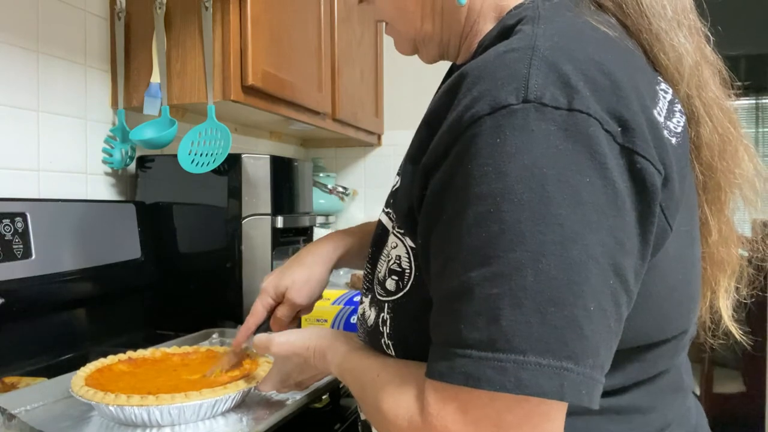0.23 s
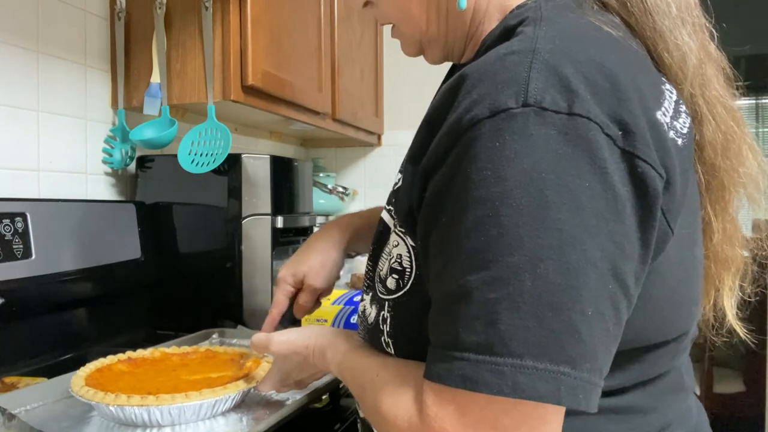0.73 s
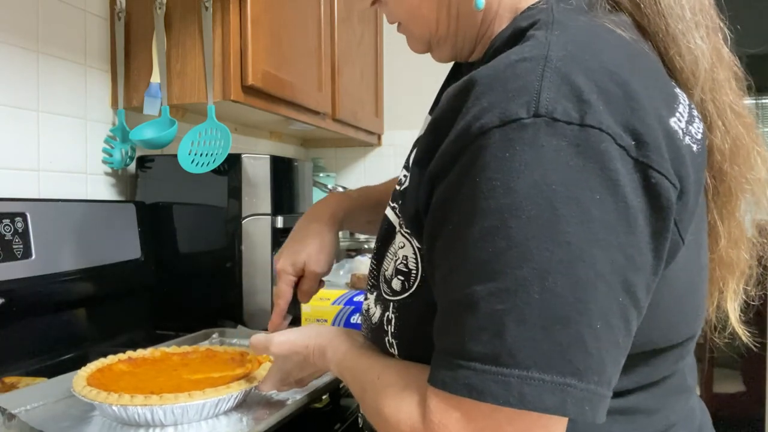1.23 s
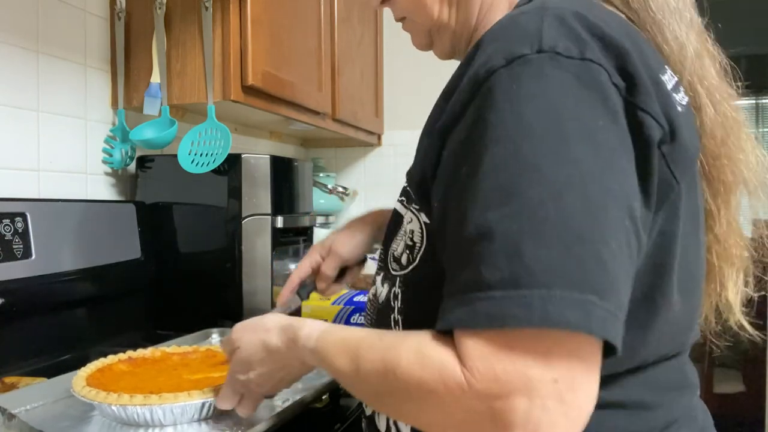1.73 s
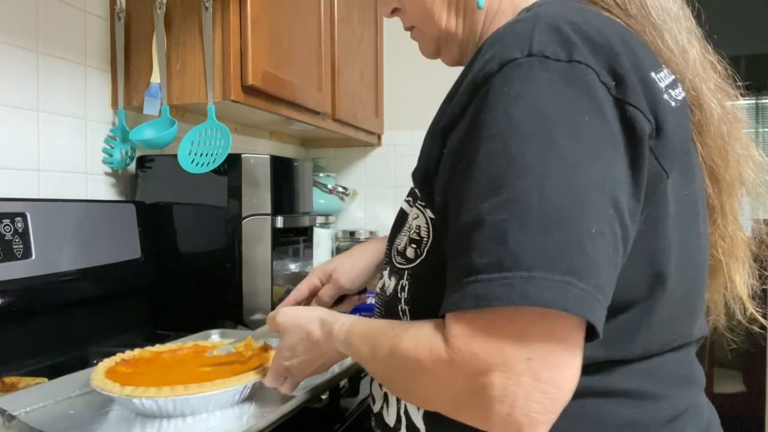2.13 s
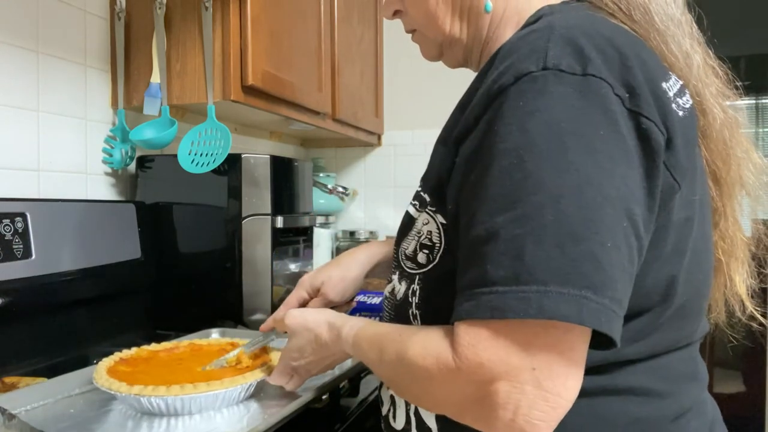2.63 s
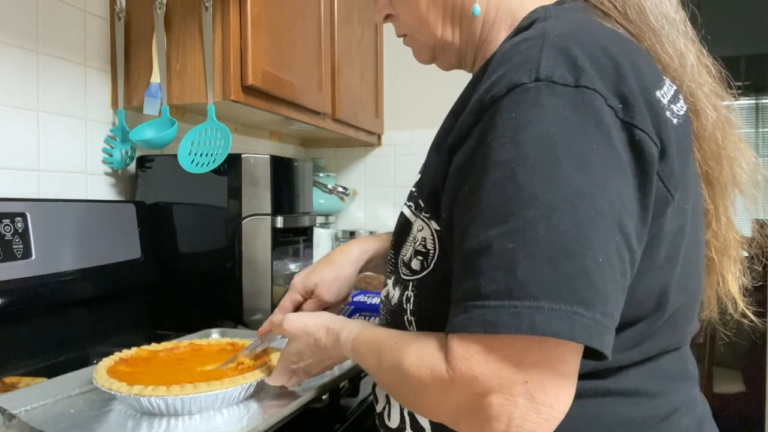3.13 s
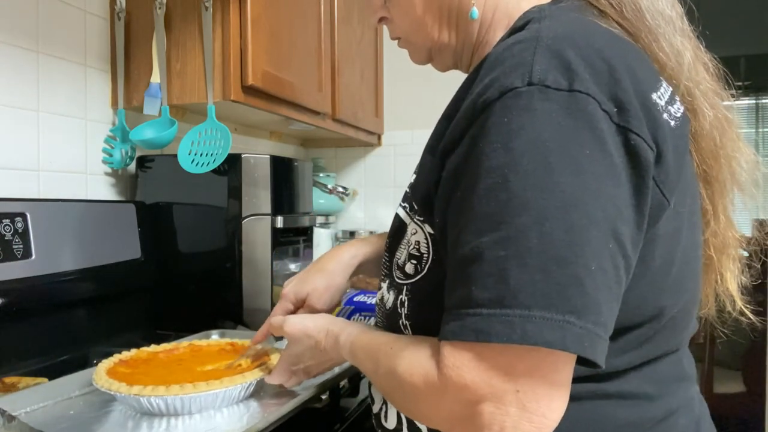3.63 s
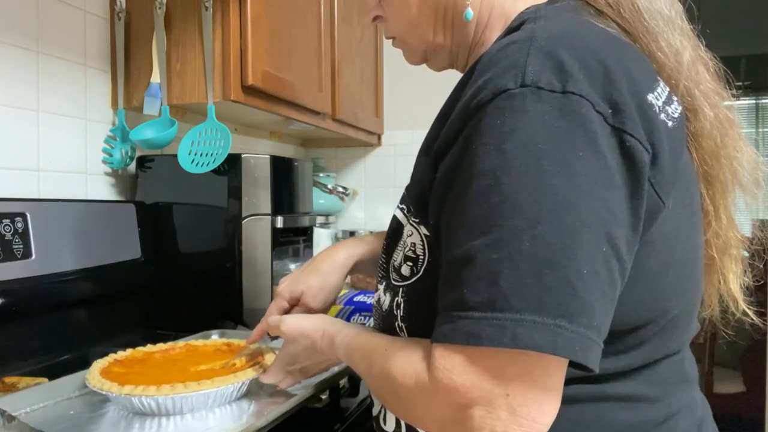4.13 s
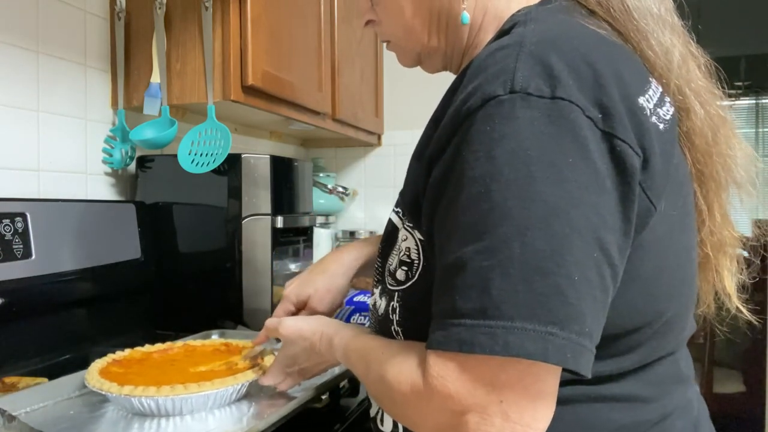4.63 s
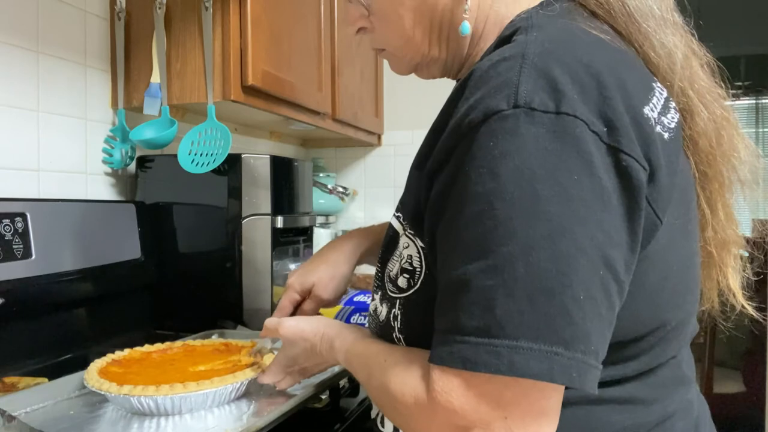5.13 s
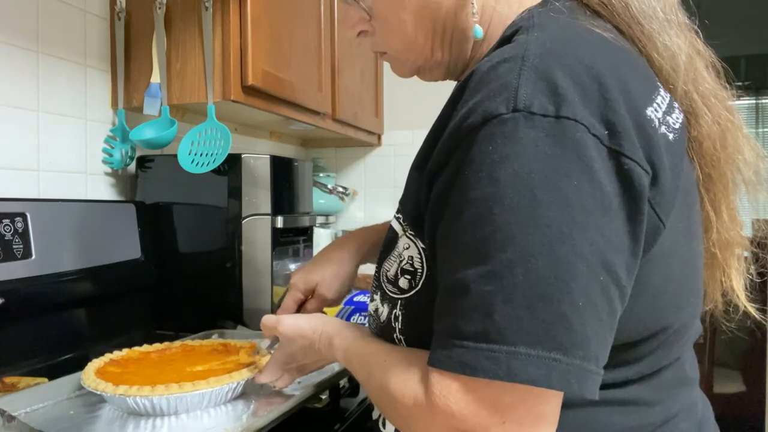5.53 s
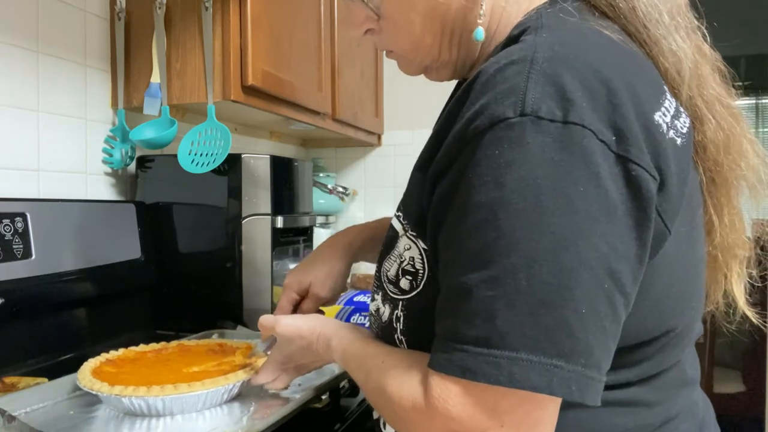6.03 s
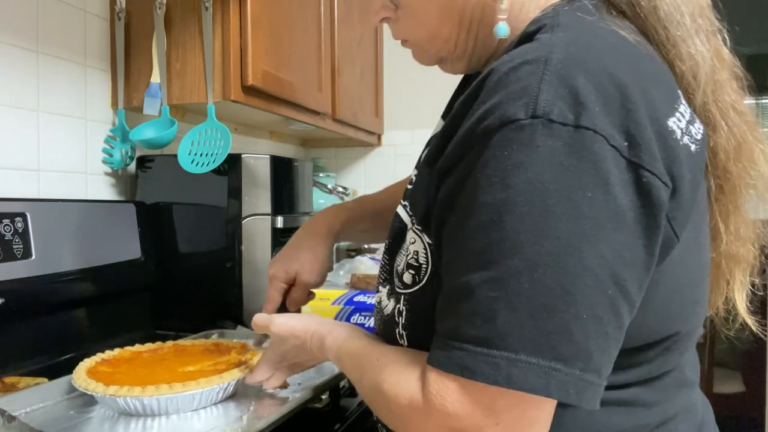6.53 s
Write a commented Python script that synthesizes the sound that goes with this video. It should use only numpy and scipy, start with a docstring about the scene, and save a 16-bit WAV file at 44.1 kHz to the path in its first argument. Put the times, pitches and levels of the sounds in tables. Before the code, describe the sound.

A small tiled kitchen with a low, slightly wavering appliance rumble and very faint hiss. For the first 0.4 s there are only tiny ticks; then a tin knock with a tray thump, a light scrape, and a sharp foil crack at 0.77 s. After a lull, crisp crinkly jabs and scrapes cluster from 1.5 to 2.2 s, with a lighter tap near 2.5 s. It is almost still until 3.4 s, when small knocks and a faint blade clink restart the work. Taps continue to 4.1 s, with a bright loud snap at 4.3 s and softer ones to 4.7 s. From 5.0 s strong clicks, blade clinks and tray bumps come in quick groups, busiest at 5.0-5.1 and 5.7-6.1 s, with rustly scraping between. Softer tin taps and rubs trail off around 6.4-6.7 s. Sounds are close, dry and metallic, with short room echoes.

```python
"""Cutting a pie in a foil tin

In a small tiled kitchen a knife works round the crust of a pie; the foil tin stands on a baking tray.
Each jab buckles the foil in a burst of clicks, rings the tin and bumps the tray; at times the blade rings.
Scraping strokes of blade and tin are streams of tiny clicks; appliances rumble as flickering noise bands.
A phone with two microphone ports, a step away, hears it direct, by quick echoes and through the room's tail."""
import sys
import numpy as np
from scipy import signal
from scipy.fft import rfft, irfft, next_fast_len
from scipy.io import wavfile
from scipy.ndimage import uniform_filter1d

SR = 44100
rng = np.random.default_rng(int(sys.argv[2]) if len(sys.argv) > 2 else 0)


def persist_wave(psi):
    """Save psi, clipped to +-1, as 16-bit WAV."""
    counts = np.round(np.clip(psi, -1, 1) * 32767).astype(np.int16)
    wavfile.write(sys.argv[1], SR, np.atleast_2d(counts).T)


N = 299356
T = np.arange(N) / SR  # s
SIZE = next_fast_len(N + SR)  # transform length, with a second to spare for the room
HZ = np.arange(SIZE // 2 + 1) * SR / SIZE + 1e-3  # just above zero, for the logarithms

# knife jabs: t/s, crackle level before the burst's shape/dB, tin body above it/dB,
# brightness above it/dB, decay time of the crackle/ms
JABS = [(0.051, -66, 7.5, -20, 6.6), (0.205, -74.5, -9, 14, 7), (0.251, -67, -28, 10.5, 4),
        (0.282, -66.5, -12, 10, 6.7), (0.319, -62.5, -2.5, -7, 5.6), (0.388, -68, -2, 4, 19),
        (0.4157, -38.5, -5.5, -33, 13.4), (0.4905, -43, -5, -26, 9.5), (0.5964, -57, 6, -5, 5.4),
        (0.7698, -29.5, -5.5, -10.5, 4.3), (0.8752, -39.5, -5.5, -18, 5.3), (1.274, -60, -9, -8, 8.2),
        (1.393, -70, -27, -8, 8), (1.477, -45, -18, -1, 2), (1.5528, -29, -1, 0.5, 3.9),
        (1.6122, -40, 7.5, 6.5, 5.5), (1.66, -30, -1.5, -10, 5), (1.764, -34.5, 1.5, -15, 4.9),
        (1.843, -50, -9, -17, 8), (1.9012, -43.5, -2, -19, 47), (1.9192, -41, -28, 4.5, 19),
        (2.118, -37, -11, -16, 3.8), (2.474, -44.5, -2, -5, 5.2), (2.647, -60, 2, -17, 5.6),
        (2.99, -84, -1, 14, 5.6), (3.294, -67.5, -15, -3, 8.8), (3.339, -71.5, -8, 7, 20),
        (3.371, -41.5, -16, 1, 13), (3.4722, -37, -2, -13, 4.2), (3.586, -43.5, -3, -31, 8),
        (3.645, -56.5, 4.5, -31, 9.5), (3.71, -38, -2, -20, 3), (3.759, -40, -3, -9, 7.3),
        (3.929, -47.5, -11, -16, 7.9), (4.038, -42, -1.5, -14, 3.2), (4.082, -55, 1.5, -5, 8.7),
        (4.307, -45, -20, 3, 6), (4.315, -25, -14.5, -2, 6.1), (4.615, -44.5, -8, -5, 8.8),
        (4.67, -52.5, 8, -22, 12.7), (4.725, -41, -5, -29, 6.5), (4.946, -52, -14, 0.5, 9.2),
        (4.974, -52, -1.5, -2, 7.8), (4.9984, -30, -10.5, 2, 5.1), (5.0549, -32.5, -4.5, -0.5, 9.9),
        (5.1079, -29, -2, -4.5, 3.2), (5.197, -39, -23, -5, 5.7), (5.34, -34, -1, -23, 2.8),
        (5.414, -45.5, 0.5, 1.5, 8.1), (5.641, -63, 2, -4, 6), (5.667, -65.5, 3, 14, 6.8),
        (5.6974, -29, -3.5, -4.5, 8.6), (5.7468, -25.5, -7, -2.5, 5.4), (5.7988, -29.5, -17, -21, 2.7),
        (5.843, -38, 0.5, -25, 5.4), (5.887, -40, -1.5, -9, 4), (5.952, -43.5, 6.5, -18, 4.8),
        (6.0434, -32, -1, -7, 4.5), (6.083, -29.5, -5, -3.5, 4), (6.109, -40, 0.5, -16, 14),
        (6.3595, -54.5, 1.5, 3, 16.6), (6.406, -46.5, -18, 4, 2.6), (6.439, -51, 5.5, -9, 14),
        (6.4767, -53.5, 11.5, -18, 3.9), (6.638, -61, -5, 6, 6.8), (6.701, -56.5, -10, -10, 7.3)]


def undb(db):
    """Decibels to gain."""
    return 10 ** (np.asarray(db) / 20)


def unit(x):
    """Scale to rms 1."""
    return x / np.sqrt(np.mean(np.abs(x) ** 2))


def along_hz(table):
    """A (f/Hz, value) table read at every frequency, on a log axis."""
    hz, value = np.transpose(table)
    return np.interp(np.log(HZ), np.log(np.maximum(hz, 1)), value)


def through(x, response):
    """Filter by a frequency response."""
    return irfft(rfft(x, SIZE) * response, SIZE)[..., :N]


def modes(table):
    """Response of (f/Hz, width/Hz, level/dB) resonances, neighbours in opposite phase."""
    total = 0
    for k, (hz, width, db) in enumerate(table):
        damping = 1j * HZ * width
        total = total + (-1) ** k * undb(db) * damping / (hz ** 2 - HZ ** 2 + damping)
    return total


def walk(rate):
    """Random levels held 1 / rate s and slewed; spread near 1."""
    hold = int(SR / rate)
    steps = np.repeat(rng.standard_normal(N // hold + 1), hold)
    return 1.02 * uniform_filter1d(steps, hold)[:N]


def clicks(per_s, scatter_db):
    """Dense random clicks of uneven size, rms 1."""
    scatter = np.minimum(rng.exponential(size=N), 4)  # caps the rare giants
    size = undb(scatter_db * scatter) * rng.standard_normal(N)
    return unit(size * (rng.random(N) < per_s / SR))


def even(hz, over_s):
    """White noise whose strength below hz stays even over over_s."""
    x = rng.standard_normal(N)
    power = through(x, 1 / (1 + 1j * HZ / hz) ** 2) ** 2
    return x * np.sqrt(power.mean() / uniform_filter1d(power, int(over_s * SR)))


def jabs():
    """Each jab is a burst of buckling clicks that dies away, with a bump of the tray; at times the blade rings."""
    bite_s, body_slower = 0.00078, 3.09  # onset time; the heavy tin body follows late and lasts
    slower = np.array([[body_slower], [1], [1]])
    force = np.zeros((3, N))  # tin body, middle, bright crinkle
    for s, db, body_db, bright_db, length_ms in JABS:
        span = slice(int(s * SR), int(s * SR) + SR // 2)
        after = np.maximum(T[span] - s, 0) / slower
        burst = (1 - np.exp(-after / bite_s)) * np.exp(-after / (length_ms / 1000))
        force[:, span] += undb(db + np.array([[body_db], [0], [bright_db]])) * burst
    crackle = clicks(12000, 0.73)
    body = force[0] * even(3300, 0.0035)
    middle, bright = force[1:] * crackle
    return tin(body, middle, bright) + clinks(crackle) + tray()


def tin(body, middle, bright):
    """The foil tin rings from three shares of the force: its body, the middle and the bright crinkle."""
    # dense mass of foil modes: f/Hz, level/dB
    foil_mass = [(150, -10.5), (350, -12.5), (600, -7), (1500, -3.5), (3500, -1.5), (5500, -7), (8000, -12),
                 (11000, -15.5), (15000, -24.5)]
    # single modes of the tin: f/Hz, width/Hz, level/dB before ring_db
    tin_modes = [(555, 105, -5), (1084, 65, -2.5), (1404, 210, -19), (1853, 8.8, -1.5), (3100, 29, -11)]
    ring_db = 10.5  # lifts the single modes against the foil mass
    body_top_hz, bright_from_hz = 1700, 4000
    ring = undb(along_hz(foil_mass)) * (1 + undb(ring_db) * modes(tin_modes))
    low = modes([(body_top_hz / 3, body_top_hz, 0)]) / (1 + 1j * HZ / body_top_hz) ** 2
    high = (1 - 1 / (1 + 1j * HZ / bright_from_hz)) ** 2
    between = (1 - low) * (1 - high)
    return (through(body, unit(ring * low)) + through(middle, unit(ring * between))
            + through(bright, unit(ring * high)))


def clinks(crackle):
    """The blade knocks the rim: decaying bursts of the crackle's clicks ring its resonances."""
    # knocks on the rim: t/s, level/dB
    knocks = [(3.474, -52), (5.0548, -29.5), (5.1075, -37), (5.7457, -26), (5.8017, -45), (5.848, -36)]
    # ringing of the blade: f/Hz, width/Hz, level/dB
    blade_modes = [(2950, 200, -6), (3720, 220, 0), (4500, 200, -8)]
    decay_s = 0.0022
    force = sum(undb(db) * (T >= s) * np.exp(-np.abs(T - s) / decay_s) for s, db in knocks)
    return through(force * crackle, unit(modes(blade_modes)))


def tray():
    """Jabs and thumps of the tin push the baking tray: short swells of noise in its low resonances."""
    # extra thumps of the tin down on the tray: t/s, level/dB
    thumps = [(.415, -43.5), (1.66, -55), (1.9, -48), (3.474, -50.5), (3.585, -61), (4.67, -52),
              (5.055, -43.5), (5.19, -56), (5.747, -42), (5.95, -60), (6.044, -51), (6.1, -50),
              (6.445, -53)]
    # resonances of the tray: f/Hz, width/Hz, level/dB
    tray_modes = [(63.2, 13.8, 5.5), (112, 22, -2.5), (169.3, 10.5, -1), (221.4, 28, 1), (264.8, 36.6, -1)]
    bump_s = 0.013  # from the start of a push to its peak
    push_db, usual_body_db = -54, -39.5  # push for a jab of usual tin body level
    push_slope = 0.4  # dB of push per dB of tin body
    pushes = [(s, push_db + push_slope * (db + body_db - usual_body_db)) for s, db, body_db, *_ in JABS]
    push = np.zeros(N)
    for s, db in pushes + list(thumps):
        after = np.maximum(T - s, 0) / bump_s
        push += undb(db) * after * np.exp(1 - after)
    return through(push * even(570, 0.0232), unit(modes(tray_modes)))


def rub():
    """Stick and slip: each stroke swells, holds and fades as a stream of tiny clicks that flutters in strength."""
    # strokes of blade on crust and tin on tray: full from t/s, hold/s, level/dB,
    # tin body above it/dB, brightness above it/dB
    strokes = [(0.453,  0.19, -60.5, 3, -23), (0.763, 0.14, -58, 3, -26), (0.934, 0.11, -71, 6.5, -8),
               (1.438, 0.066, -63.5, -15, -5), (1.535, 0.12, -49.5, -5.5, 3.5), (1.74, 0.24, -56, -5, -4.5),
               (2.023, .17, -46.5, -5.5, -4), (2.219, 0.07, -58, -1.5, -6.5), (3.412, 0.35, -67, -2, -23),
               (3.741, 0.032, -51, -1, -7), (3.857, 0.1, -71, 11, -19), (4.049, 0.033, -53, -1.5, -6.5),
               (4.263, 0.051, -75, 1, -1.5), (4.36, 0.069, -63, -5, -5), (4.631, 0.02, -56, 0, -11),
               (4.793, .12, -72.5, 13.5, -10), (5.046, 0.11, -57.5, 9.5, -15),
               (5.23, 0.091, -58.5, 0.5, -13), (5.396, 0.12, -60, 1, -5), (5.726, 0.066, -48.5, 5, -17),
               (5.87, 0.28, -55, 1, -19), (6.07, 0.042, -45.5, 0.5, -10), (6.178, 0.056, -55, 2, -13),
               (6.483, 0.056, -57, 0, -2.5), (6.653, 0.064, -66, 3.5, -13)]
    swell_db_per_s, fade_db_per_s = 321, 186
    flutter_db = 3.5
    power = np.zeros((3, N))  # tin body, middle, bright crinkle
    for s, hold_s, db, body_db, bright_db in strokes:
        swell = undb(-swell_db_per_s * np.maximum(s - T, 0))
        fade = undb(-fade_db_per_s * np.maximum(T - s - hold_s, 0))
        power += (undb(db + np.array([[body_db], [0], [bright_db]])) * swell * fade) ** 2
    slips = undb(flutter_db * walk(35)) * clicks(2700, 2.5)
    return tin(*(np.sqrt(power) * slips))


def room(x):
    """Hands and blade keep moving, so the sound wanders from one way through the room to another."""
    paths, shifts_per_s = 6, 40
    share = np.array([walk(shifts_per_s) for _ in range(paths)])
    share /= np.sqrt(np.sum(share ** 2, axis=0))  # total power stays even
    heard = sum(rfft(x * part, SIZE) * rfft(path(), SIZE) for part in share)
    return irfft(heard, SIZE)[:N]


def path():
    """One way through the kitchen: quick echoes off tray and tiles, then a tail that loses treble first."""
    # dying away of the room: f/Hz, time to fall 60 dB/s
    decay = [(100, 1), (500, 0.53), (1500, 0.52), (4000, 0.39), (9000, 0.29), (15000, 0.3)]
    tail_db, early_db = -5, -3
    early_s = 0.0069  # decay time of the quick echoes
    t, tail = T[:SR], 0
    spectrum = rfft(rng.standard_normal(SR))
    octave = np.log2(np.arange(SR // 2 + 1) + 1)
    centres = [np.log2(hz) for hz, _ in decay]
    for k, (_, t60) in enumerate(decay):
        weight = np.interp(octave, centres, np.arange(len(decay)) == k)
        tail = tail + irfft(spectrum * weight, SR) * undb(-60 * t / t60)
    early = rng.standard_normal(SR) * np.exp(-t / early_s)
    return undb(tail_db) * tail / np.linalg.norm(tail) + undb(early_db) * early / np.linalg.norm(early)


def kitchen():
    """Appliance rumble as noise in half-octave bands that flicker alone, over a faint hiss."""
    # spectrum of the rumble before its overall level is set: f/Hz, level per Hz/dB
    rumble_spectrum = [(25, -24), (40, -2), (60, 1.5), (90, -13), (135, 3.5), (200, -7.5), (300, -13.5),
                       (500, -18), (800, -28), (1500, -37), (3000, -38.5), (3700, -36), (4500, -43),
                       (9000, -44), (12000, -52)]
    rumble_db, hiss_db, flicker_db = -58, -84, 0.5
    noise = rfft(rng.standard_normal(N), SIZE) * undb(along_hz(rumble_spectrum))
    rumble = 0
    for octave in np.arange(4.5, 13.6, 0.5):  # band centres, log2 of Hz
        band = np.maximum(1 - 2 * np.abs(np.log2(HZ) - octave), 0)
        rumble = rumble + undb(flicker_db * walk(4)) * irfft(noise * band, SIZE)[:N]
    return undb(rumble_db) * unit(rumble) + undb(hiss_db) * rng.standard_normal(N)


def scene():
    """Both microphone ports share one sound field, shifted in phase, and each hears a part of its own."""
    # power that both ports share: f/Hz, share
    port_alike = [(60, 0.84), (150, 0.95), (300, 0.45), (700, 0.074), (2000, 0.19), (4000, 0.057),
                  (8000, 0.94), (15000, 0.97)]
    # lead of the left port: f/Hz, phase/rad
    port_phase = [(0, 0), (1380, 0.9), (2070, 1.5), (3010, -4.4), (3700, -5.8), (6290, -1.3), (6890, -0.8),
                  (8700, 0.6), (9730, 2.8), (10900, 3.3), (12500, 6.3), (13700, 6.3), (14600, 9.3),
                  (16000, 9.5)]
    # left minus right: f/Hz, level/dB
    port_balance = [(40, 1.5), (125, 2.5), (250, 0), (1000, 0), (3000, -1.4), (8000, -0.5)]
    direct_db = -5
    pie = jabs() + rub()
    shared, left, right = (room(pie) + kitchen() for _ in range(3))
    shared += undb(direct_db) * pie
    alike = np.clip(along_hz(port_alike), 0, 1)
    lean = undb(along_hz(port_balance) / 2)  # half the difference to each port
    hz, phase = np.transpose(port_phase)
    turn = np.exp(0.5j * np.interp(HZ, hz, phase))
    ports = []
    for own, gain, shift in ((left, lean, turn), (right, 1 / lean, 1 / turn)):
        common = through(shared, np.sqrt(alike) * gain * shift)
        ports.append(common + through(own, np.sqrt(1 - alike) * gain))
    return np.array(ports)


def record(dry):
    """The phone drops the deepest bass (below 43.5 Hz) and cuts the top (above 15 kHz)."""
    thin = signal.sosfilt(signal.butter(3, 43.5, "high", fs=SR, output="sos"), dry)
    return signal.sosfilt(signal.ellip(8, 0.2, 70, 15000, fs=SR, output="sos"), thin)


dry = scene()
out = record(dry)
persist_wave(out)
```